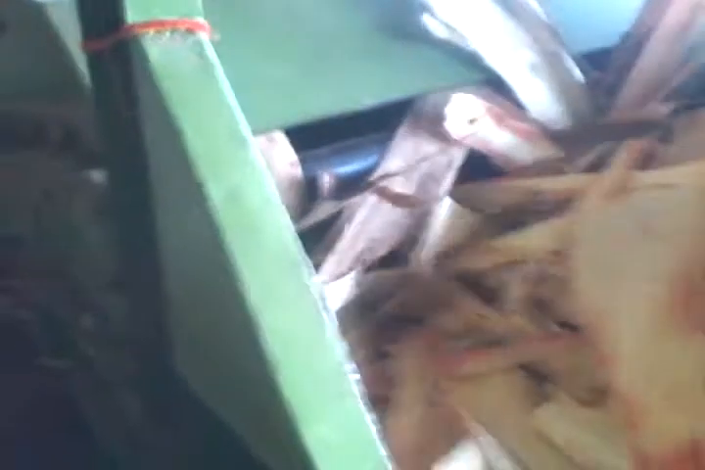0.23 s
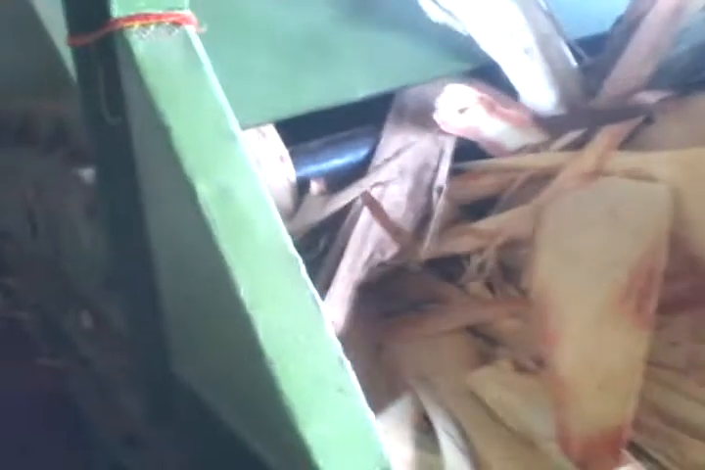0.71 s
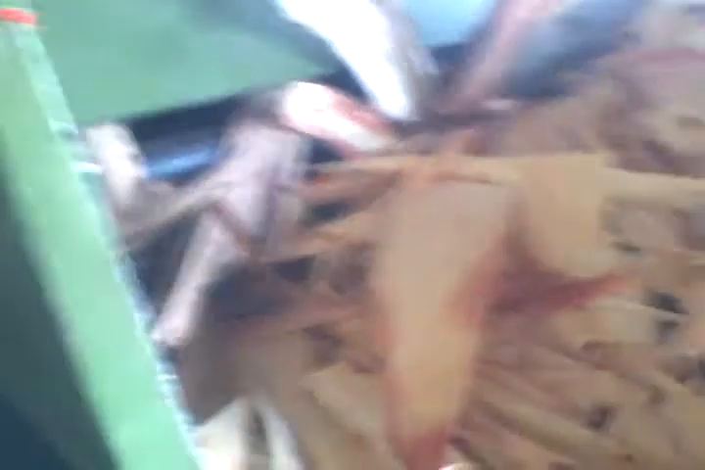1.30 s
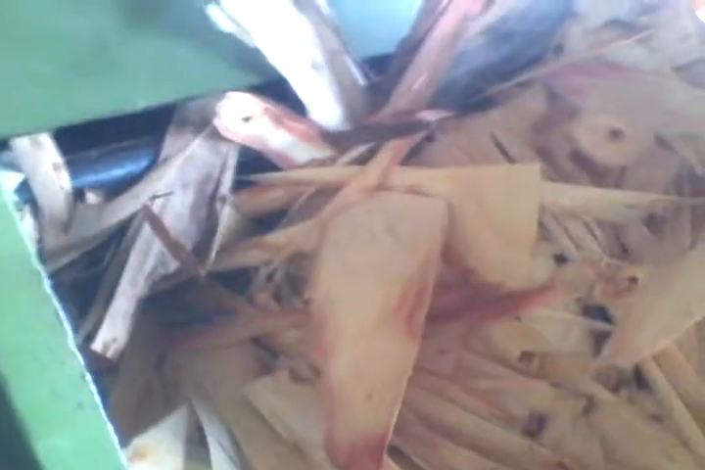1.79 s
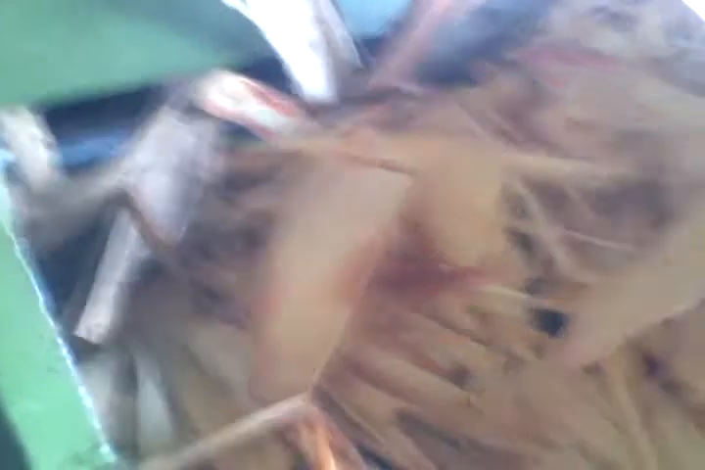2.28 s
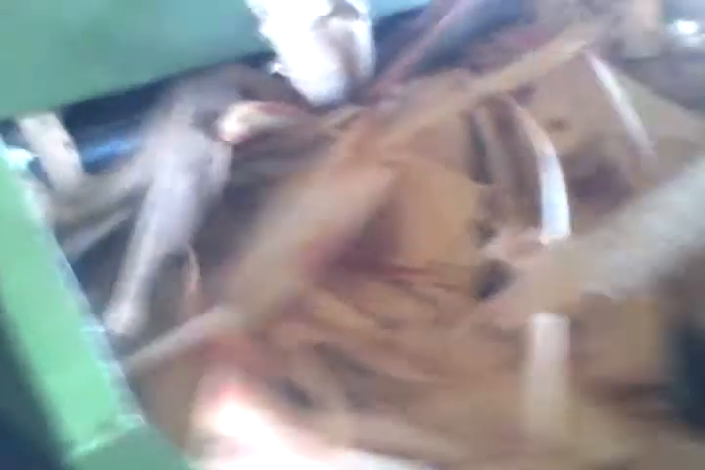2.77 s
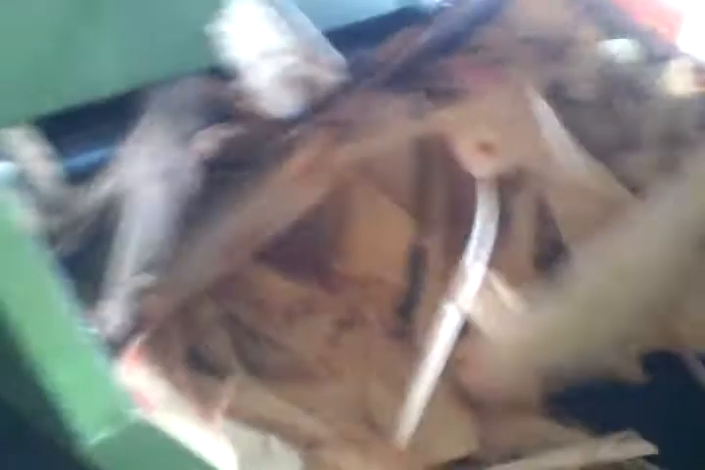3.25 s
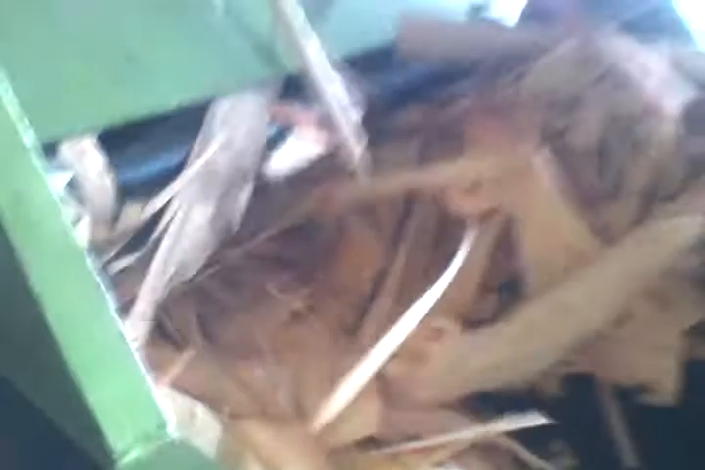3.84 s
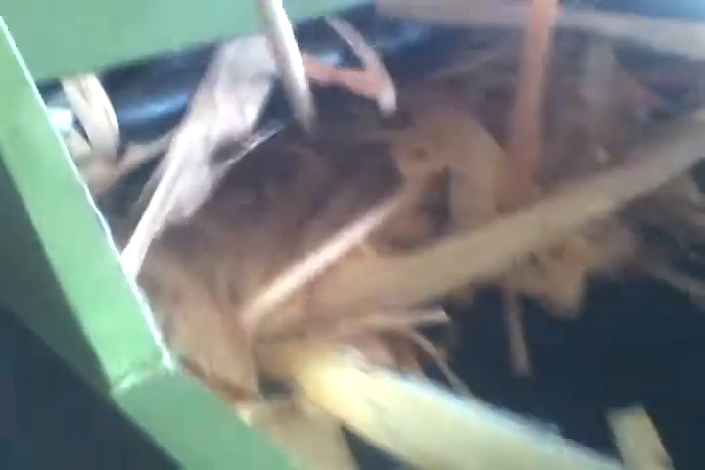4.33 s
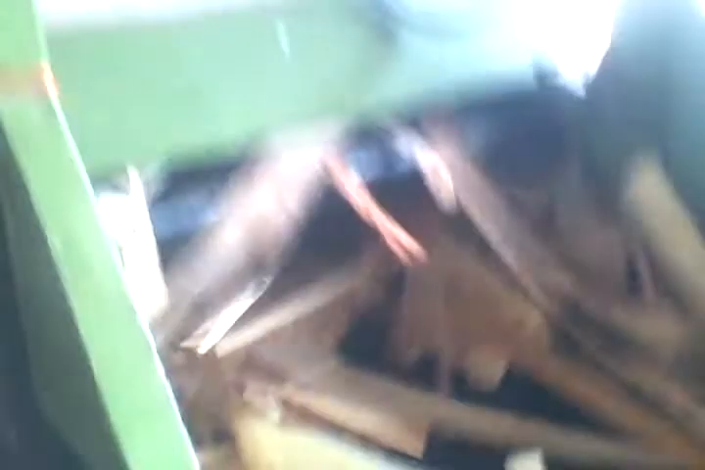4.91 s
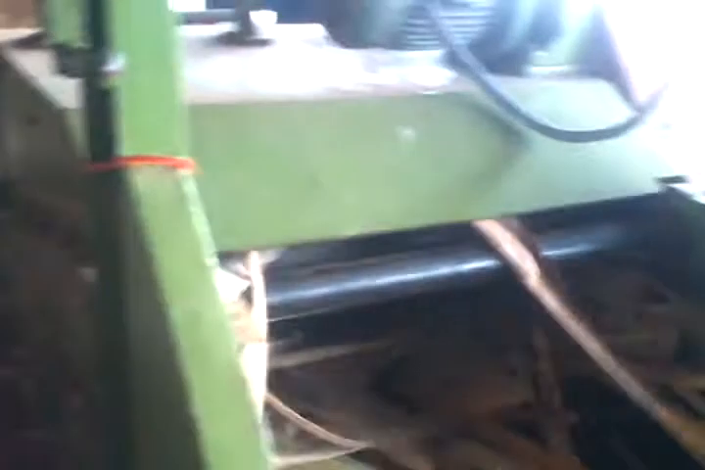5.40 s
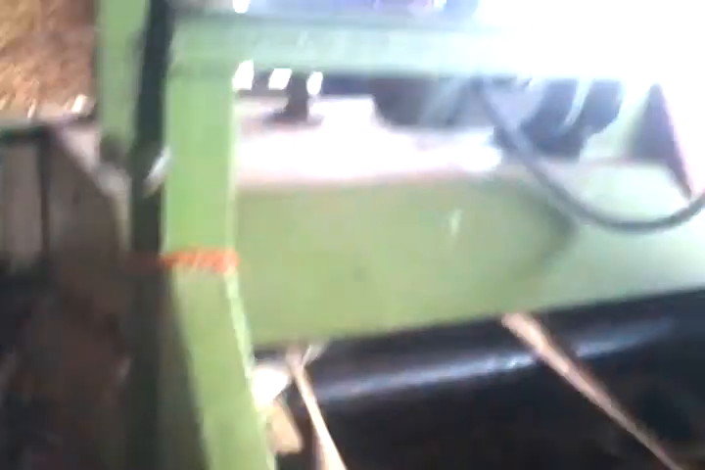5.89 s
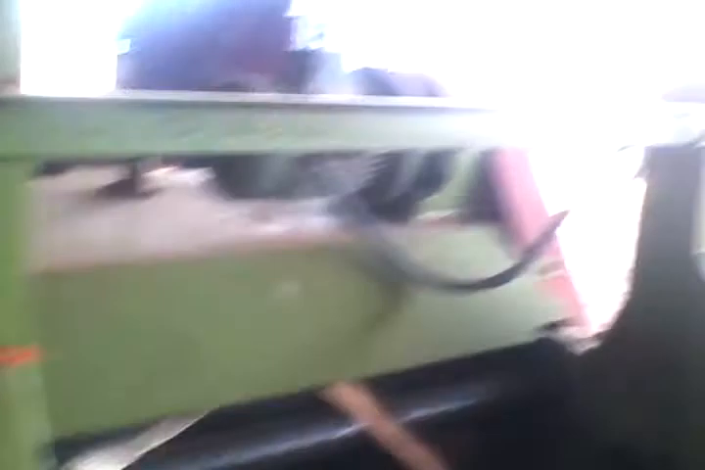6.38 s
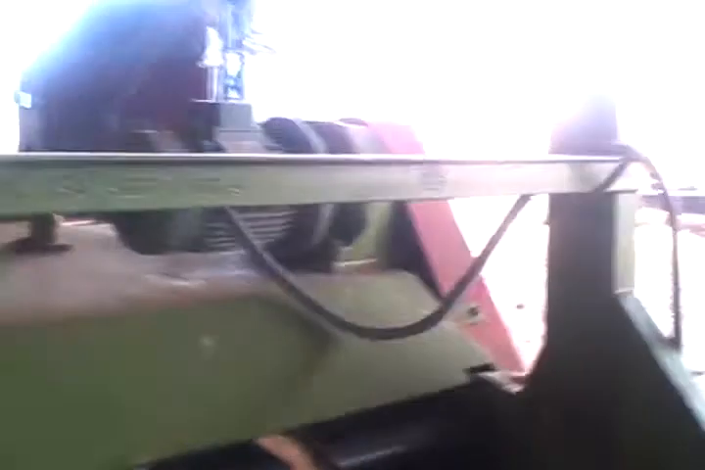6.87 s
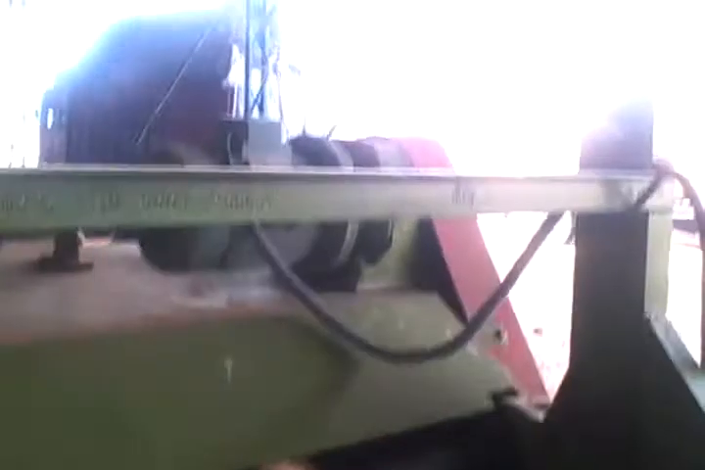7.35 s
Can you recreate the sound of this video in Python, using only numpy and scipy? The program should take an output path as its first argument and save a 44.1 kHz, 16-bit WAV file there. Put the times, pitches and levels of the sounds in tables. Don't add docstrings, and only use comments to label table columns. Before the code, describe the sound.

Fast throbbing machine roar with spraying chips, a violent second of grinding and cracking wood, then hollow thuds and a brighter steady chatter.

```python
import sys
import numpy as np
from scipy import signal
from scipy.fft import rfft, irfft
from scipy.io import wavfile
from scipy.ndimage import uniform_filter1d

SR = 44100
rng = np.random.default_rng(int(sys.argv[2]) if len(sys.argv) > 2 else 0)


def gain_from_db(level_db):
    decades = np.asarray(level_db, float) / 20
    return 10 ** decades


def materialize(psi):
    bounded = np.clip(np.atleast_2d(psi).T, -1, 1)
    quanta = np.round(bounded * 32767).astype(np.int16)
    wavfile.write(sys.argv[1], SR, quanta)


N = 336924


def evened(x):
    return x / np.sqrt(np.mean(x ** 2) + 1e-20)


def band(x, lo_hz, hi_hz, order=4):
    return signal.sosfilt(signal.butter(order, [lo_hz, hi_hz], "band", fs=SR, output="sos"), x)


def resonate(x, hz, width):
    r = np.exp(-np.pi * width / SR)
    return signal.lfilter([1 - r, 0, r - 1], [1, -2 * r * np.cos(2 * np.pi * hz / SR), r * r], x)


def add(mix, s, sound):
    part = mix[round(s * SR):][:len(sound)]
    part += sound[:len(part)]


# time in seconds, knife lead in passes.
LEAD = [(0, .65), (.7, .65), (1, .64), (1.5, .72), (2.08, .83), (2.5, .76), (3, .7), (3.5, .67), (3.9, .69),
        (4.5, .74), (5.1, .735), (5.6, .69), (6, .62), (6.33, .56), (6.8, .63), (7.2, .7), (7.64, .79)]


def rotor(spread_db, jitter_s):
    knives_hz = 30.5
    t = np.arange(N) / SR
    regaining = 1.15 * np.maximum(1 - t / 0.8, 0) ** 2
    passes = knives_hz * t + np.interp(t, *np.transpose(LEAD)) + regaining
    count = passes.astype(int)
    bite, late = rng.standard_normal((count.max() + 1, 2)).T
    at = np.flatnonzero(np.diff(count)) + 1
    struck = at + np.round(late[count[at]] * jitter_s * SR).astype(int)
    clicks = np.zeros(N)
    clicks[np.clip(struck, 0, N - 1)] = gain_from_db(spread_db * bite[count[at]])
    return passes % 1 / knives_hz, gain_from_db(spread_db * bite)[count], clicks


# time in seconds, clear path from knives to listener 0-1, loose wood rattling on the plates 0-1,
# splinter patchiness in dB.
SIGHT = [(0, .25, .24, 2.5), (.7, .25, .28, 2.5), (1, .25, .35, 2.5), (1.9, .25, .35, 2.5),
         (2.1, .32, .3, 5.2), (3.2, .45, .33, 5.2), (3.7, .6, .3, 2.5), (5.5, .55, .3, 3),
         (6.2, .75, .3, 3), (6.5, 1.1, .3, 2), (7.64, 1.1, .3, 2)]


def on_path(column, t):
    return np.interp(t, *np.transpose(SIGHT)[[0, column]])


# frequency in Hz, width in Hz, share (negative where
HOUSING = [
    [(125.5, 27.3, 0.83), (147.8, 19.2, -1.02)],
    [(210.3, 33.6, 0.68), (241.2, 23.7, -0.9), (265.1, 17, 1)],
    [(302.9, 15, 0.35), (335.3, 23.5, 0.82)],
    [(362.8, 26, 0.81), (386.6, 33, -0.85), (421, 24.3, 0.72)],
]
ARRIVE_S = [.006, -.0055, -.003, -.0028]


def housing(since, bite, clicks):
    rough = on_path(2, np.arange(N) / SR)
    crush = (2.5 + bite * np.exp(-since / 0.026)) * rng.standard_normal(N)
    drive = (1 - rough) * evened(clicks) + rough * evened(crush)
    centres = [(137, 570), (243, 93), (325, 116), (400, 590)]
    out = np.zeros(N)
    for layer, (group, centre, late) in enumerate(zip(HOUSING, centres, ARRIVE_S)):
        ring = sum(swing * resonate(drive, hz, width) for hz, width, swing in group)
        plate = evened(resonate(ring, *centre))
        out += loudness(layer) * np.roll(plate, round(late * SR))
    return out


def patchy(bins, frames):
    a, b, patches = rng.standard_normal((N // 128 + 5, 257, 3)).T
    patch_db = on_path(3, np.arange(a.shape[1]) * 128 / SR)
    patches = uniform_filter1d(patches, size=bins, axis=0)
    patches = evened(uniform_filter1d(patches, size=frames, axis=1))
    spectrum = (a + 1j * b) * gain_from_db(patch_db * patches)
    return evened(signal.istft(spectrum, nperseg=512, noverlap=384)[1][:N])


def share(x, lo_hz, hi_hz):
    octaves = np.log2(np.fft.rfftfreq(N, 1 / SR) + 1)

    def rise(hz):
        return np.sin(np.pi / 2 * np.clip((octaves - np.log2(hz)) * 2 + .5, 0, 1)) ** 2

    return irfft(rfft(x) * (rise(lo_hz) - rise(hi_hz)), N)


# frequency in Hz, spectral density in dB.
COLOUR = [(240, -49.5), (400, 16), (453, -9.5), (534, -6), (583, -8), (739, -5), (849, -7), (1160, -12),
          (1970, -12.5), (2860, -21.5), (4910, -24.5), (6380, -21), (7240, -29), (8000, -43), (10400, -81),
          (17600, -120)]


def colour_taps():
    hz, db = np.transpose(COLOUR)
    log_hz = np.log(np.fft.rfftfreq(4096, 1 / SR) + 1)
    colour = gain_from_db(np.interp(log_hz, np.log(hz), np.maximum(db, -70)))
    causal = np.exp(signal.hilbert(np.log(np.r_[colour, colour[-2:0:-1]])).conj())
    return np.fft.ifft(causal).real[:2048]


# lower edge in Hz, upper edge in Hz.
CHIP_BANDS = [(470, 1100), (1100, 2600), (2600, 5200), (5200, 9000)]
# frequency in Hz, width in Hz.
BARS = [(535, 38), (625, 18), (675, 16), (810, 25), (890, 19), (1020, 38), (1350, 320), (1930, 38)]


def chips(since, bite, clicks):
    sight = on_path(1, np.arange(N) / SR)
    spray = sight * (1 - np.exp(-since / .0007)) * np.exp(-since / .011) * bite
    stray_size = gain_from_db(1.7 * np.minimum(rng.exponential(1, N), 5))
    strays = stray_size * (rng.random(N) < 900 / SR) * rng.choice([-1, 1], N)
    echo = clicks + .45 * np.roll(clicks, round(.0082 * SR))
    rung = sight * evened(0.2 * echo + sum(resonate(echo, hz, width) for hz, width in BARS))
    noise = patchy(bins=3, frames=22)
    taps = colour_taps()
    steadies, blows = [.3, .26, .32, .36], [.9, .27, .12, .06]
    out = np.zeros(N)
    for layer, edge, steady, blow in zip(range(4, 8), CHIP_BANDS, steadies, blows):
        drive = evened((steady + spray) * noise) + blow * rung + .25 * evened(strays)
        heard = share(signal.oaconvolve(drive, taps)[:N], *edge)
        out += loudness(layer) * heard / np.sqrt(uniform_filter1d(heard ** 2, size=SR // 2))
    return out


IDLE_DB = [-47.5, -45, -50.5, -49.5, -52, -58.5, -63, -65.5, -69.5]
FOLLOW = [0.31, 0.63, 0.76, 0.24, 0.66, 0.5, 0.72, 0.84, 0.81]
OPEN_DB = [0.7, 3.5, 5, 7.5, 3.5, 10, 7.5, 8.5, 4.5]
BESIDE_DB = [2, -7.5, 2.5, -4.5, 5.5, 4, 3.5, 3.5, .6]
# time in seconds, light feeding in dB, facing the opening 0-1, beside the drum 0-1.
WALK = [(0, 4, 0, 0), (.6, 4.5, 0.03, 0.22), (.7, 2, 0, 0), (1.0, 2.5, 0, 0), (1.25, -0.2, 0.09, 0.04),
        (1.95, 0.3, 0.16, 0.15), (3.5, 1, .95, 0.1), (3.8, 0, 0.92, 0.3), (4.2, 0.4, 1, 0),
        (4.7, 2, 0.9, 0.23), (5.15, 8, 0.72, 0), (5.6, 5.5, 1.05, 0.17), (5.78, 15.5, 0.87, 0.1),
        (6.15, 7.5, 0.99, 0), (6.38, 1, 0.97, 0.66), (6.9, 1.2, 0.9, 0.69), (7.3, 0.9, 0.86, 1.02),
        (7.64, -2.5, 0.86, 1.05)]


def idling(layer, t):
    s, *columns = np.transpose(WALK)
    feeding, facing, beside = (np.interp(t, s, c) for c in columns)
    heard_db = OPEN_DB[layer] * facing + BESIDE_DB[layer] * beside
    return gain_from_db(IDLE_DB[layer] + FOLLOW[layer] * feeding + heard_db) ** 2


SOFT_DB = [-25.5, -15.5, -33.5, -31, -37.5, -42.5, -43.5, -43, -43.5]
CORE_DB = [-35, -21.5, -28.5, -19.5, -22.5, -23, -37, -32, -56.5]
# time in seconds, load in dB, depth 0 soft end - 1 hard core.
THICK = [
    (1.995, -34, .02),
    (2.015, -9, 0.32),
    (2.14, 0.7, 0.19),
    (2.5, 1.3, 0.34),
    (2.9, -0.65, 1),
    (3.17, 0.5, 0.78),
    (3.24, -11, 1.1),
    (3.4, -18.5, 0.96),
    (3.65, -29, 1.15),
]


def thick_piece(layer, t):
    s, *columns = np.transpose(THICK)
    load, depth = (np.interp(t, s, c, -99, -99) for c in columns)
    contrast_db = CORE_DB[layer] - SOFT_DB[layer]
    return gain_from_db(load + SOFT_DB[layer] + contrast_db * np.maximum(depth, 0)) ** 2


def bursts(t, rows, layer, rise_db, fall_db, next_db, hold_s=0):
    s, db, place = np.transpose(rows)[:, :, None]
    away_db = np.maximum(np.maximum(rise_db * (s - t), fall_db * (t - s - hold_s)), 0)
    return (gain_from_db(db + next_db * abs(layer - place) - away_db) ** 2).sum(0)


def plate_place(layer):
    return layer or -0.55


# time in seconds, level in dB, plate 0 drum - 3 chute.
SLAMS = [
    (2.007, -25, 0.7),
    (5.685, -15, 1.06),
]
SLAM_RISE = 2400


def slams(layer, t):
    return bursts(t, SLAMS, plate_place(layer), SLAM_RISE, fall_db=1300, next_db=-6, hold_s=0.039)


# time in seconds, level in dB, plate.
LEANING = [
    (0.0044, -36.5, 0.99),
]


def leaning(layer, t):
    return bursts(t, LEANING, layer, SLAM_RISE, fall_db=52, next_db=-13, hold_s=0.53)


# time in seconds, level in dB, plate 0 drum - 3 chute.
LURCHES = [(2.05, -17, 1.05), (2.152, -12, 2.05), (2.23, -16, 3), (2.28, -16.5, 3), (2.322, -13.5, 2.9),
           (2.382, -11, 2.1), (2.49, -14, 1.05), (2.489, -16, 3.5), (2.59, -12.5, 1.3), (2.592, -14.5, 2.9),
           (2.7, -14, 1.05), (2.7, -11.5, 2.9), (2.79, -10.5, 3), (2.791, -21, 1.2), (2.94, -19, 3),
           (2.98, -11.5, 2.9), (3.06, -28, 0), (3.17, -25, 1.05), (3.17, -21, 3), (3.3, -36, 0),
           (3.42, -36, -.5), (5.17, -41, .4), (5.378, -21.5, 1.5), (5.54, -32.5, 1.05), (5.665, -35, .3),
           (6.08, -27, 2.5), (7.4, -36, .05)]
LURCH_RISE, LURCH_FALL, LURCH_NEXT_DB = 406, 333, -10.5


def lurches(layer, t):
    return bursts(t, LURCHES, plate_place(layer), LURCH_RISE, LURCH_FALL, LURCH_NEXT_DB)


def frame_answer(t):
    slow = .6
    jolts = bursts(t, LURCHES + SLAMS, 0, slow * LURCH_RISE, slow * LURCH_FALL, slow * LURCH_NEXT_DB)
    return gain_from_db(2 * -25.5) * jolts


# time in seconds, level in dB, grain 0 coarse knock - 3 fine dust.
SNAPS = [(.88, -56, 2.1), (.58, -57, 2.3), (1.72, -47, 1.44), (1.85, -43.5, 1.16), (2.015, -37, .05),
         (2.288, -24, 2.59), (2.32, -31, .05), (2.49, -20, 0.54), (2.5, -32, 2.9), (2.549, -25, .45),
         (2.64, -34, .05), (2.742, -22.5, 3), (2.74, -38, .2), (2.891, -20, 0.11), (2.941, -22.5, 3.37),
         (2.98, -23, 3.64), (2.98, -16.5, 0.21), (3.04, -18.5, 0.67), (3.12, -17, 0.17), (3.171, -27, 2),
         (3.189, -21, 1.05), (3.25, -30, .05), (3.378, -29, 1.24), (4.49, -48, 3), (5.53, -42.5, .05),
         (5.749, -36.5, 1.6), (5.77, -46, 1.9), (5.96, -43, 2.9), (6.08, -32.5, .05), (6.11, -31.5, 3)]


def snaps(layer, t):
    return bursts(t, SNAPS, layer % 4, rise_db=407, fall_db=246, next_db=-11.5)


def loudness(layer):
    t = np.arange(0, N / SR, 1 / 500)
    power = idling(layer, t) + thick_piece(layer, t) + slams(layer, t) + leaning(layer, t)
    if layer in range(4):
        power = power + lurches(layer, t)
    elif layer in range(4, 8):
        power = power + snaps(layer, t)
    else:
        power = power + frame_answer(t)
    return np.interp(np.arange(N) / SR, t, np.sqrt(power))


# start in seconds, peak level in dB, pitch in Hz, 60 dB decay in seconds.
KNOCKS = [(0.769, -27, 205, 0.073), (0.967, -33, 112, .05), (5.168, -22.5, 118, 0.053),
          (5.329, -23, 121, .04), (5.363, -17, 112, 0.043), (5.394, -20, 311, 0.18),
          (5.524, -31, 129, 0.049), (5.655, -35, 72, 0.063), (5.689, -18.5, 85, 0.06),
          (6.086, -22, 132, .04), (6.211, -33, 90, 0.047)]


def knocks():
    out, t = np.zeros(N), np.arange(SR // 4) / SR
    settling = 0.0027 * (1 - np.exp(-t / 0.0068))
    for s, db, hz, t60 in KNOCKS:
        ring = np.sin(2 * np.pi * hz * (t + settling))
        decay = gain_from_db(db - 60 * t / max(t60, .01))
        add(out, s, decay * (1 - np.exp(-t / 0.00026)) * ring)
    return out


# start in seconds, level in dB, pitch in Hz, width in Hz, length in seconds.
SCRAPES = [(0.213, -47.5, 780, 257, 0.095), (0.354, -41, 800, 40.4, 0.13), (0.867, -44, 6670, 850, 0.052),
           (1.114, -57, 6700, 1100, 0.076), (1.69, -45.5, 1876, 138.9, 0.076),
           (1.835, -45, 2500, 600, 0.092), (1.844, -49, 3140, 200, 0.11), (2.004, -40, 830, 60, 0.049),
           (2.46, -28, 2720, 505, 0.11), (3.305, -31.5, 1905, 185.2, .2), (3.681, -40, 1740, 300, 0.069),
           (4.466, -45, 6660, 1080, 0.067), (5.013, -37, 880, 60, 0.048), (0.564, -56, 6140, 2160, 0.085),
           (5.436, -45, 4330, 353, 0.067), (5.504, -41.5, 6160, 185, 0.022), (5.202, -42, 2070, 140, 0.076),
           (5.233, -33.5, 840, 75.6, 0.13), (5.342, -40.5, 1674, 179, 0.12),
           (6.094, -35.5, 5140, 1800, 0.14), (6.135, -39.5, 1930, 200, 0.11), (5.972, -42, 1830, 500, 0.19),
           (5.719, -35.5, 1350, 200, 0.069), (6.145, -46, 5500, 1085, 0.084)]


def scrapes():
    out = np.zeros(N)
    noise = rng.standard_normal((len(SCRAPES), 2 * SR))
    for (s, db, hz, width, length), row in zip(SCRAPES, noise):
        u = np.arange(round(length * SR)) / (length * SR)
        tone = evened(resonate(resonate(row, hz, width), hz, width))[-len(u):]
        add(out, s, gain_from_db(db) * np.sin(np.pi * u ** 0.33) * tone)
    return out


def rumble():
    return loudness(layer=len(IDLE_DB) - 1) * evened(band(rng.standard_normal(N), 18, 130, order=2))


def scene():
    knives = rotor(spread_db=-1.0, jitter_s=0.000072)
    plates = band(housing(*knives), 95, 3100, order=2)
    mono = plates + chips(*knives) + rumble() + knocks() + scrapes()
    drift = evened(band(rng.standard_normal(N), 20, 300, order=1))
    side = gain_from_db(-19) * band(mono, 3750, 9000, order=3) * drift
    return np.array([mono + side, mono - side])


def band_limit(x):
    return signal.sosfilt(signal.butter(12, 9810, fs=SR, output="sos"), x)


def record(dry):
    ending = np.minimum(np.arange(N)[::-1] / 200, 1)
    limit = signal.firwin(301, 7500, window=("kaiser", 8), fs=SR)
    mix = signal.oaconvolve(dry * ending, limit[None], "same")
    return band_limit(mix)


dry = scene()
out = record(dry)
materialize(out)
```